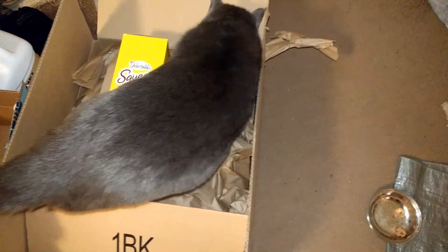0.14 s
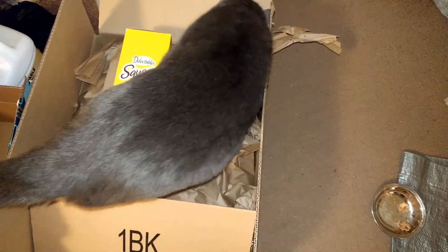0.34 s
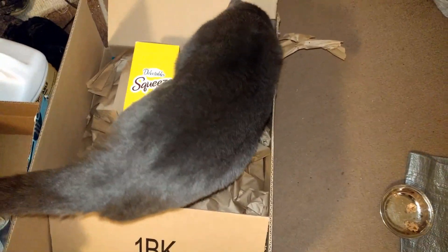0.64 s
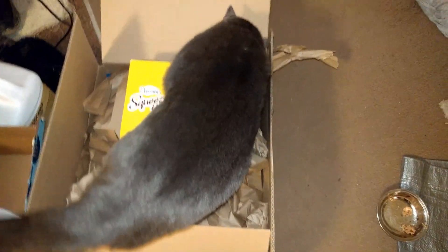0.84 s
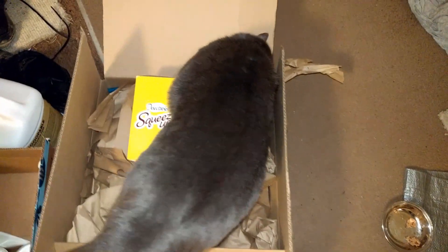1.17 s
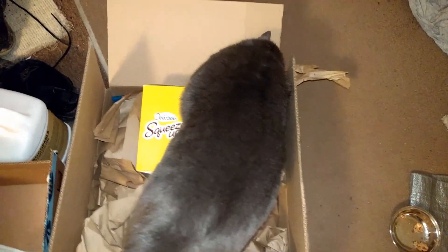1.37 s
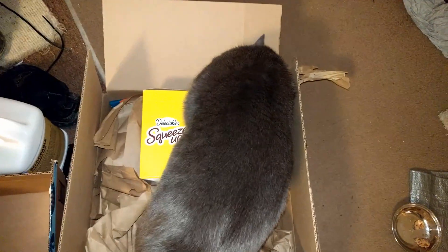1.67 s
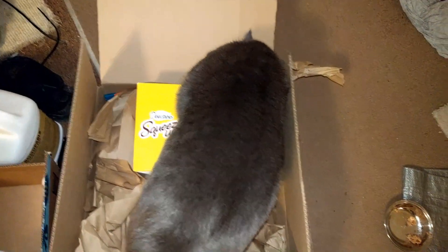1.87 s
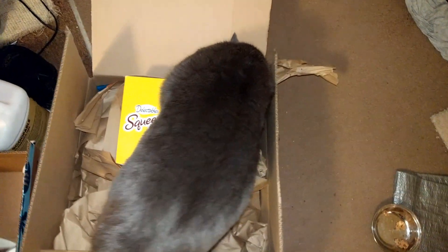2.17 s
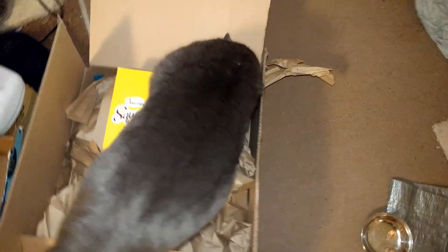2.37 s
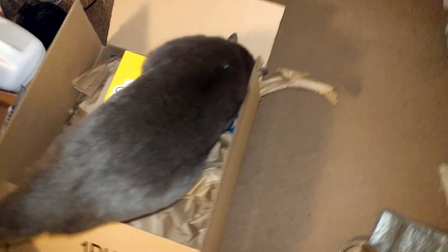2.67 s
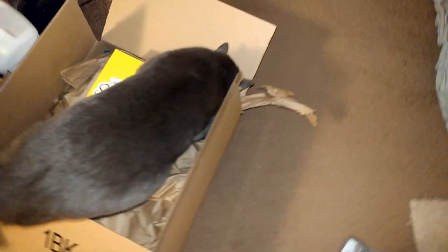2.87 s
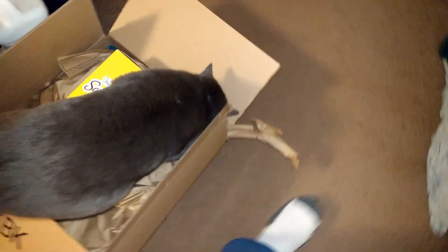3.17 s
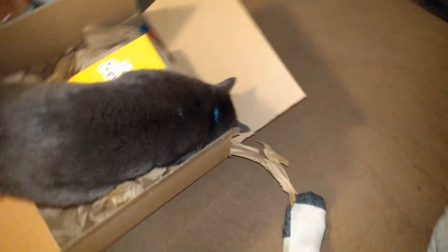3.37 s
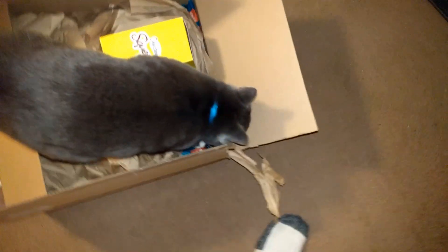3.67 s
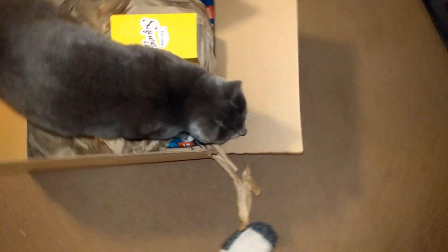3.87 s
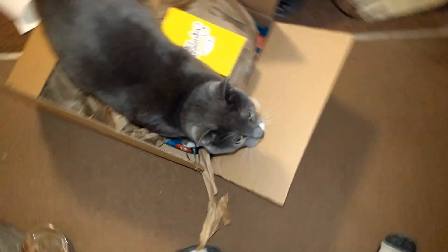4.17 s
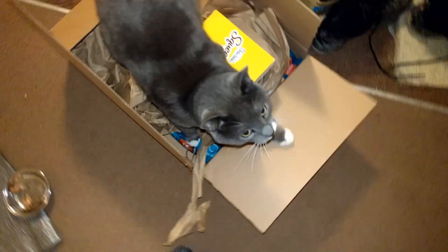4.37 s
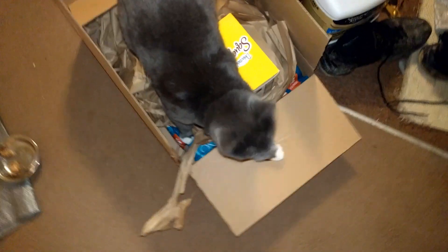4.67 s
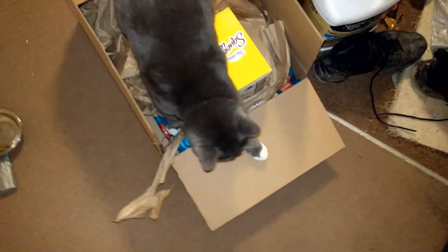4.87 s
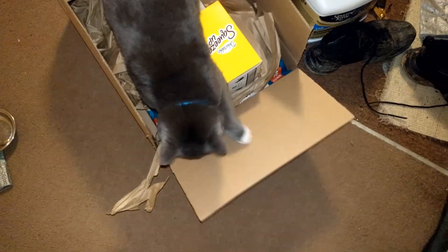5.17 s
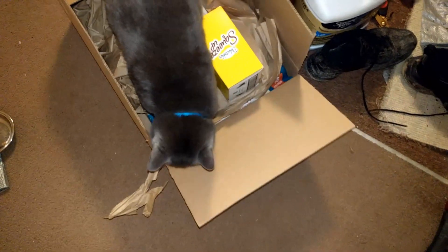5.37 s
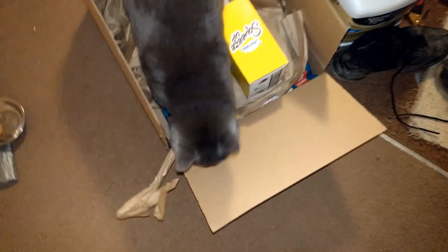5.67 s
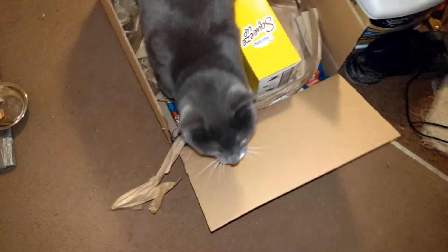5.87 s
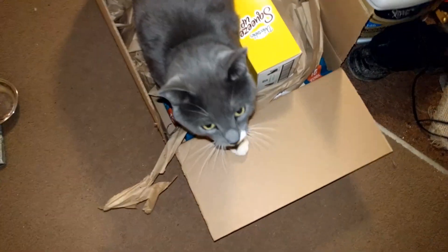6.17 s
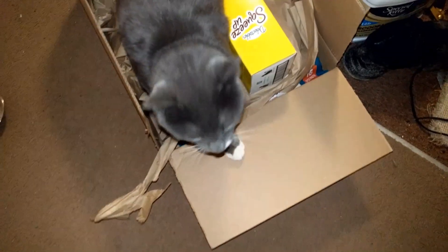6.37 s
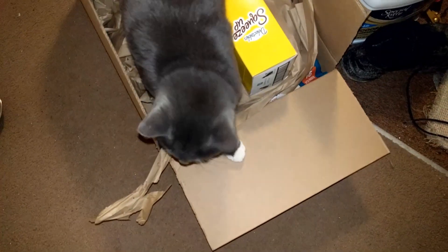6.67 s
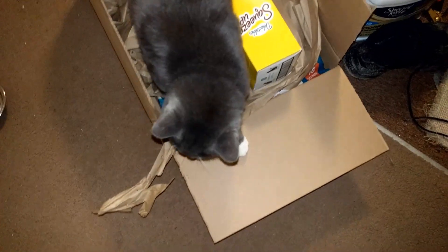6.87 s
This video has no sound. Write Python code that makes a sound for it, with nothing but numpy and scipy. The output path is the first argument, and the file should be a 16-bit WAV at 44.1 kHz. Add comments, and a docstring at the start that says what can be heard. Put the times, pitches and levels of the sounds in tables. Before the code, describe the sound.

Close, dry sound of a cat rummaging in a cardboard box full of crumpled packing paper, in a quiet carpeted room. Faint low air, a weak wavering hum and slight hiss run throughout. From 0 to 1 second, paws shove the paper in short gritty scrapes, with crisp snaps, soft thumps and hollow cardboard knocks around 0.4 and 0.9. From 1 to 2 the crinkling continues, with a longer fluttering crackle near 1.55. After a lull, sharp pops come at about 2.46 and lighter rustles follow. At 3.15 a wad gives way: a dense, bright burst of snaps, the loudest moment, lasting about 0.15 seconds. Scattered clicks come near 3.9. From 4.4, smooth fur strokes swell softly with fine crackle, a clear cardboard tap sounds at 5.1, then gentle brushing and small taps around 6 to 6.4 fade to near quiet by 7.

```python
"""A cat noses through a cardboard box of crumpled packing paper in a quiet carpeted room with a humming appliance.
From the start its body rubs the paper (streams of tiny slips), paws shove sheets, knock and scuff the cardboard
(decaying tones), and creases snap (clicks with a flutter). After 3 seconds a wad gives way in a burst of small snaps.
From about 4.4 seconds fur also strokes the paper in smooth swells of fine crackle.
Air, hum (wavering tones) and hiss last throughout; the microphone port rings, mainly near 7 kHz."""
import sys
import numpy as np
from scipy import signal
from scipy.fft import rfft, irfft, next_fast_len
from scipy.io import wavfile
from scipy.ndimage import uniform_filter1d

SR = 44100
rng = np.random.default_rng(int(sys.argv[2]) if len(sys.argv) > 2 else 0)


def file_out(sig):
    """Save sig as 16-bit WAV at sys.argv[1]."""
    # one column per channel
    cols = np.atleast_2d(sig).T
    # limit, then scale
    lim = np.clip(cols, -1, 1)
    pcm = np.round(lim * 32767).astype(np.int16)
    wavfile.write(sys.argv[1], SR, pcm)


N = 309577
T = np.arange(N) / SR  # time in seconds

# Colour of the low room noise. Each row: frequency in Hz, relative level in dB.
ROOM_AIR = [(20, -43), (31, -32), (42, 0), (52, 5.5), (68, -3), (90, -1.5), (130, -2.5), (200, -3),
            (300, -7), (480, -8), (650, -18), (1100, -20), (2500, -27.5), (7000, -32), (15000, -34.5)]
# Tones of the appliance hum. Each row: frequency in Hz, rms level in dB before its waver and swell.
HUM = [(64.3, -66.5), (57.6, -56.5), (120.3, -66), (235.7, -68)]
# Hum level as the microphone moves through the standing waves of the room. Each row: time in seconds, change in dB.
HUM_SWELL = [(0, -11.5), (1.8, -3), (4, 0.5), (5.3, -7), (7, -3.5)]
# The body leaning and rubbing on the paper. Each row: time in seconds, relative treble and middle levels in dB.
RUB = [(0, -56, -60), (.76, -60, -66), (1, -55, -63), (1.19, -58, -66), (1.4, -55, -62.5),
       (1.9, -56.5, -62.5), (2, -56, -69), (2.28, -49.5, -69.5), (2.4, -59, -66), (2.9, -53, -66),
       (3.13, -49, -61), (3.45, -54, -68), (3.879, -55.5, -74.5), (4.24, -57, -75), (4.35, -47.5, -63.5),
       (4.46, -49.5, -64.5), (4.781, -54, -56), (5.05, -67.5, -68.5), (5.54, -61.5, -74), (5.8, -55, -64.5),
       (6.1, -53, -59), (6.36, -57.5, -65), (6.47, -70, -74), (7.02, -77, -93)]
RUB_UNEVEN_DB, RUB_CATCHES_PER_S = 1.9, 40
# Facets of crumpled paper, large to small. Each row: resonance in Hz, its width in Hz.
FACETS = [(500, 1080), (1100, 1160), (2000, 1000), (3500, 1800), (5600, 2200), (7500, 3300), (10000, 2300),
          (13500, 9600)]
# The two colours of sliding paper. Each row: frequency in Hz, relative level in dB.
SLIDE_TREBLE = [(1500, -45), (3500, -5.5), (5000, 6.5), (7000, 5.5), (10000, 7), (12500, 2), (16000, -36)]
SLIDE_MIDDLE = [(100, 3), (350, 8), (700, 0), (1300, -0.5), (2500, -4), (4500, -6), (8000, -13),
                (16000, -48)]
# A paw shoves a sheet along. Each row: start and length in seconds, relative treble and middle levels in dB.
SHOVES = [(0.014, 0.095, -44.5, -54), (0.173, 0.11, -51, -48), (0.324, 0.1384, -45.5, -52),
          (0.573, 0.082, -43, -67), (0.621, 0.079, -43, -60), (0.814, 0.079, -49, -55),
          (0.932, 0.064, -56, -53.5), (1.017, 0.09, -56.5, -53), (1.252, 0.12, -65, -54.5),
          (1.409, 0.11, -49.5, -51.5), (1.538, 0.092, -40.5, -59), (1.625, 0.078, -63, -50),
          (1.742, 0.18, -57, -57.5), (2.445, 0.088, -43.5, -53), (2.643, 0.13, -54, -52),
          (2.81, 0.098, -62, -53), (2.913, 0.051, -73, -54), (3.133, 0.035, -41, -51),
          (3.32, 0.059, -53, -51.5), (3.88, 0.19, -48, -58.5), (4.692, 0.11, -70, -56),
          (4.892, 0.083, -60, -55), (5.123, 0.056, -79, -51), (5.408, 0.074, -62, -59)]
SHOVE_RISE = 0.07  # share of a shove spent gathering speed
# Small creases that give at random during a shove; their (treble, middle, low) levels are relative to the shove.
TICKS_PER_S, TICK_DB, TICK_SCATTER_DB, TICK_RING_MS = 55, (-3, -4, -7.5), 4, 5.6
TICK_FLUTTER_DB, TICK_SETTLE_DB = -2, -5  # sheet flutter and settling paper, relative to the first click
TICK_FOLD_HZ = (1310, 7760)  # range of their resonances
# Paws on the cardboard panels. Each row: start in seconds, peak level in dB before the low cut, panel pitch in Hz,
# time to ring down by 60 dB in seconds, fading time of the scuff in seconds.
KNOCKS = [(0.024, -37.5, 757, 0.019, 0.0048), (.354, -37.5, 765, 0.017, 0.0053),
          (.39, -41.5, 433, 0.028, .008), (.391, -32.5, 590, 0.027, 0.0032),
          (.3955, -33.5, 873, 0.043, 0.003), (.41, -41, 730, 0.0063, 0.037),
          (.92, -31, 1080, 0.016, 0.0023), (.9203, -38, 330, 0.028, 0.00089),
          (4.462, -48, 1450, 0.0075, 0.07), (4.478, -48, 854, 0.0042, 0.056),
          (4.468, -47.5, 442, 0.011, 0.095), (5.1173, -29, 793, 0.025, 0.00028),
          (5.1175, -33, 1550, 0.011, .0004), (5.126, -43, 640, 0.014, 0.013),
          (5.14, -41, 1100, 0.0037, 0.026), (5.412, -51.5, 2500, 0.005, 0.02),
          (6.101, -45, 900, 0.0035, 0.0042), (6.111, -47, 520, 0.0065, 0.028),
          (6.205, -38.5, 1080, 0.0031, .004), (6.303, -42.5, 1220, 0.008, 0.0036),
          (6.377, -42, 1250, 0.0042, 0.0023)]
# Ring of a panel. Each row: multiple of the panel pitch, relative level in dB.
PANEL = [(1.001, 15), (1.5, -6), (1.85, -22), (2.7, -29)]
# Soft steps on the box floor. Each row: start in seconds, level in dB, final pitch in Hz,
# time to die away by 60 dB in seconds.
STEPS = [(0.1333, -31.5, 95, 0.027), (.672, -40.5, 105.1, 0.035), (0.698, -50, 69.6, 0.25),
         (1.431, -47, 388, 0.056), (2.11, -40, 213, 0.026), (3.182, -41, 195, 0.074),
         (3.272, -44, 318, 0.039)]
# Loud creases snapping through. Each row: start in seconds, relative treble, middle and low levels in dB,
# ring time of the sheet in ms, its flutter and the settling paper in dB relative to the first click,
# resonance of the fold in Hz.
CREASES = [(.0248, -41, -40, -40.5, 8, -4, -13, 4410), (.034, -31, -34.5, -41, 10.6, 8, -22, 8000),
           (.0861, -63, -41.5, -40, 15, 13, -16, 3100), (.18, -34.5, -40.5, -41, 14, 1, -7, 3700),
           (.2168, -45, -43, -35, 9, 5, -14, 4400), (.2249, -46, -46, -36, 10, -5, -15, 4500),
           (.2442, -44, -41, -50, 13, 11, -12, 5000), (.2653, -36, -44, -55, 11, 3, -17, 2600),
           (.3275, -59, -44.5, -46, 14, 8, -11, 4190), (.3535, -62, -53, -39, 10, -7, -7, 3630),
           (.3943, -42, -45, -35, 12, -4, -8, 6000), (.409, -43.5, -43.5, -41, 10, 0, -9, 5200),
           (.5022, -24, -34, -44, 15, 6, 0.5, 2770), (.5646, -35.5, -39, -52, 12, 5, -2, 6300),
           (.568, -30, -45, -44, 10, -1, -11, 6190), (.6155, -25, -34.5, -40, 13, 3, -2, 8020),
           (.622, -43, -39, -55, 7.6, 2, -10, 5850), (.7, -44.5, -58, -64, 6, -7, -20, 5480),
           (.8102, -32, -33.5, -49, 14.2, -3, 1, 2500), (.8128, -29, -36.5, -39.5, 13, -18, 3, 5270),
           (.9199, -28, -30.5, -28, 9.1, -2, -3.5, 2280), (.9237, -43, -45, -40, 8.4, -11, 1, 5270),
           (1.0245, -63, -48.5, -61, 20, 7, 2, 2200), (1.043, -56, -54, -62, 9, 2, -7, 4020),
           (1.2175, -64, -65, -55, 13, -1, -8, 2000), (1.2355, -53, -47, -48, 9.3, 0, -8, 4800),
           (1.073, -39, -38.5, -43, 20, 4, -20, 5000), (1.1445, -41, -43.5, -48.5, 19, 6, -10, 3500),
           (1.2623, -39.5, -38, -37.5, 26.6, 13, -15, 1710), (1.335, -39, -40, -37, 31, 4, -5, 4600),
           (1.413, -36.5, -64, -61, 6.6, -4, -14, 3605), (1.4225, -51, -61, -54, 9, 0, -8, 9510),
           (1.4455, -42, -62, -59, 15, 0, -7, 6910), (1.491, -32.5, -52, -59, 7.2, 0, -1, 9560),
           (1.502, -41, -46, -55, 16.4, 3, -1, 5280), (1.5475, -26, -41, -43, 110, 17, 10, 3110),
           (1.5625, -29, -47, -48, 38, 1, 2, 3900), (1.633, -42, -48, -57, 20, 4, -6, 3300),
           (1.696, -56, -61, -57, 17, 2, -10, 2300), (1.7485, -47, -55, -60, 8.6, 0, -9, 5880),
           (1.7665, -34.5, -41.5, -53, 20, -1, -14, 2850), (1.815, -46, -46, -53, 28, 9, -7, 3470),
           (1.8525, -36.5, -46, -33.5, 19, 5, -17, 1500), (1.9052, -37.5, -46, -41, 41, 7, 1, 2950),
           (2.0365, -44, -77, -70.5, 9.1, -5, -16, 6310), (2.3559, -70, -42.5, -40, 42, 4, -10, 5900),
           (2.4575, -39, -42, -43, 8, -7, -14, 5500), (2.4622, -30, -61, -43, 5.7, -4, -14, 6830),
           (2.4651, -21, -40.5, -40.5, 9.3, -29, -23, 3166), (2.4755, -33, -49, -64, 9.7, 6, -5, 6340),
           (2.6575, -34.5, -41.5, -47, 6.2, -3, -8, 13000), (2.6745, -41, -42, -62, 20, 8, -3, 4640),
           (2.735, -60, -63, -50, 13, 0, -15, 2990), (2.819, -45, -55, -70, 27, -6, -2, 4090),
           (2.836, -52, -52, -62, 14, 2, -5, 4500), (2.8558, -38, -59, -60, 15, 2, -15, 5745),
           (2.9156, -60, -49, -60, 18, 6, -11, 4200), (3.1546, -23, -38, -51, 8.4, -4, -4, 7500),
           (3.157, -32, -33.5, -45, 7, -8, 0, 3750), (3.1655, -23, -33.5, -56, 12, -3, 1, 8500),
           (3.175, -20, -30, -37, 8, 1, -2, 8500), (3.1868, -10, -37, -42, 6, -16, -25, 1820),
           (3.1946, -27, -40, -55, 5.4, -4, -8, 9500), (3.2012, -27, -43, -35, 6, -8, -9, 5700),
           (3.209, -23, -42, -37, 11, 5, -8, 5640), (3.2135, -28, -38, -52, 9.8, -2, 0, 6240),
           (3.223, -33.5, -30, -36, 13.6, -3, 9, 2940), (3.229, -27, -45, -51, 12, 6, -8, 2200),
           (3.2345, -31, -46, -41, 6, -3, -6, 6500), (3.243, -27, -35, -39, 18, -2, 7, 3460),
           (3.2465, -26, -41, -48, 17, 0, -3, 6200), (3.264, -30, -44, -38, 9, -5, -1, 6600),
           (3.2825, -26, -35, -27.5, 31, 11.5, 10, 1500), (3.3053, -41, -50, -41, 7, -6, -6, 1500),
           (3.342, -36, -44.5, -47, 26, 0, 8, 3080), (3.8235, -40, -45.5, -35.5, 22, 0.5, -2, 5400),
           (3.9012, -27, -36.5, -39.5, 5, -4, -18, 4250), (3.9036, -33.5, -40, -49, 11, -1, -5, 6820),
           (3.9767, -28, -41, -39.5, 10, -6, -3, 5200), (3.999, -41, -56, -60, 16, 2, -8, 4910),
           (4.04, -49, -53, -47, 16, -1, -9, 6000), (4.6952, -72, -46.5, -63, 12, -11, -13, 2304),
           (4.9034, -39, -34, -42.5, 8.6, -4, -8, 5150), (5.021, -48, -78, -71, 15, 4, -8, 4800),
           (5.1173, -40.5, -32.5, -43.5, 10, -5, -8.5, 2500), (6.302, -43.5, -42, -49, 20, 4, -10, 3750),
           (6.378, -61, -52.5, -54, 13, 12, -5, 1790)]
# Basic colour of a snap. Each row: frequency in Hz, relative level in dB.
SNAP_COLOUR = [(100, -7.5), (300, -4.5), (800, 4), (1500, 2), (3000, -2.5), (4600, -0.5), (7000, -8),
               (10500, -16.5), (12500, -21), (16000, -59)]
TIGHT_FOLD_HZ, TIGHT_DB_PER_OCTAVE = 6940, 16  # folds above this pitch snap with an ever crisper top
# A wad collapses under the cat: its crackle holds steady, then dies away, the treble first.
WAD_START_S, WAD_FADE_DB_PER_S = 3.156, 202.5
WAD_TREBLE_DB, WAD_TREBLE_HOLD_S = -43.5, .1
WAD_MIDDLE_DB, WAD_MIDDLE_HOLD_S = -46.5, 0.13
WAD_TICKS_PER_S, WAD_TICK_DB = 110, (5, -7, -3)  # small creases; (treble, middle, low) relative to its treble
# The chest strokes the paper. Each row: start and length in seconds, relative treble and middle levels in dB.
STROKES = [(4.435, 0.14, -57, -66), (4.678, 0.18, -52, -64), (5.59, 0.17, -52, -61), (5.75, 0.18, -66, -70),
           (5.842, 0.22, -56, -54), (6.044, 0.15, -49.5, -55.5), (6.176, 0.068, -54, -66)]
# Resonances of the microphone port. Each row: frequency in Hz, width in Hz, boost in dB.
PORT = [(6570, 1210, 7), (6906, 880, 5.5), (10400, 900, 1)]
TOP_HZ = 15900  # the microphone passes nothing much above this


def undb(db):
    """Turn decibels into a gain."""
    return 10 ** (np.asarray(db) / 20)


def unit(x):
    """Scale a sound to rms 1."""
    return x / np.sqrt(np.mean(x ** 2))


def fade(t, t60):
    """A natural dying away: down by 60 dB after t60 seconds."""
    return np.exp(-np.log(1000) * t / t60)


def add(out, s, x):
    """Mix the sound x into out from time s."""
    i = max(int(s * SR), 0)
    out[i:i + len(x)] += x[:N - i]


def shape(points, size):
    """Read a (Hz, dB) curve as gains at the frequencies of a transform."""
    hz, db = np.transpose(points)
    bins_hz = np.arange(size // 2 + 1) * SR / size
    return undb(np.interp(np.log(bins_hz + 1), np.log(hz), db))


def colour(x, points):
    """Filter a long noise with a (Hz, dB) curve and scale it to rms 1."""
    size = next_fast_len(N, True)
    spectrum = rfft(x, size) * shape(points, size)
    return unit(irfft(spectrum, size)[:N])


def causal(gain):
    """Make the click with these gains whose energy comes as early as possible."""
    cepstrum = irfft(np.log(gain))
    half = len(cepstrum) // 2
    cepstrum[1:half] *= 2
    cepstrum[half + 1:] = 0
    return irfft(np.exp(rfft(cepstrum)))


def walk(rate):
    """Smooth random drift with a spread near 1, heading for a new value `rate` times a second."""
    knots = rng.standard_normal(1024)
    drift = np.interp(T * rate, np.arange(len(knots)), knots)
    return uniform_filter1d(drift, int(SR / rate / 2)) * np.sqrt(2)


def background(air_db=-57.0, waver_db=2.1, hiss_db=-77.0):
    """Low room noise, a wavering hum and a faint hiss, all in the middle."""
    air = colour(rng.standard_normal(N), ROOM_AIR) * undb(air_db + .5 * walk(2.62))
    hum = np.zeros(N)
    for hz, db in HUM:
        level = np.sqrt(2) * undb(db + waver_db * walk(3.57))
        hum += level * np.sin(2 * np.pi * hz * T + .5 * walk(3.08))
    hum = hum * undb(np.interp(T, *np.transpose(HUM_SWELL)))
    return air + hum + undb(hiss_db) * rng.standard_normal(N)


def crackle(per_s, spread_db):
    """Tiny fibre slips at random moments; a wider spread makes their sizes more unequal."""
    sizes = undb(spread_db * np.minimum(rng.exponential(size=N), 5))
    happens = rng.random(N) < per_s / SR
    return unit(happens * sizes * rng.choice([-1, 1], N))


def facets(per_s, spread_db, soft_hz=3000):
    """Every slip rings one facet of the paper at its own pitch; the large, low facets give more evenly."""
    out = 0
    for hz, width in FACETS:
        slips = crackle(per_s * max(width, 1500) / 2000, spread_db * min(hz / soft_hz, 1))
        out = out + signal.lfilter(*signal.iirpeak(hz, hz / width, fs=SR), slips)
    return unit(out)


def rustle(slips, treble, middle):
    """Sliding paper, fed by a stream of slips: fibres hiss, the sheets sound lower."""
    return colour(slips, SLIDE_TREBLE) * treble + colour(slips, SLIDE_MIDDLE) * middle


def rubbing(treble_db=-12.5, middle_db=2.5):
    """The body drags gritty paper, catching and slipping; once the cat stands still, its fur rubs more smoothly."""
    s, treble, middle = np.transpose(RUB)
    gritty = np.interp(T, [3.4, 4.2], [.95, .5])
    grit = unit(facets(per_s=330, spread_db=1.0) + 0.39 * crackle(per_s=180, spread_db=1.0))
    slips = np.sqrt(gritty) * grit + np.sqrt(1 - gritty) * rng.standard_normal(N)
    slips = slips * undb(RUB_UNEVEN_DB * walk(RUB_CATCHES_PER_S))
    treble_gain = undb(np.interp(T, s, treble) + treble_db)
    middle_gain = undb(np.interp(T, s, middle) + middle_db)
    return rustle(slips, treble_gain, middle_gain)


def shoves():
    """Treble and middle gain of the shoved sheets: each shove gathers speed, then slows to a stop."""
    gains = np.zeros((2, N))
    for s, length, treble_db, middle_db in SHOVES:
        speed = np.interp(T, [s, s + SHOVE_RISE * length, s + length], [0, 1, 0])
        gains += undb([[treble_db], [middle_db]]) * np.sqrt(speed)
    return gains


def treading(gains, treble_db=-16, middle_db=-2.5):
    """Shoved sheets crackle coarsely as their facets slip."""
    grit = unit(facets(per_s=130, spread_db=1.5) + 0.54 * crackle(per_s=130, spread_db=-0.5))
    return rustle(grit, gains[0] * undb(treble_db), gains[1] * undb(middle_db))


def ticks(shove, per_s, tone_db):
    """Small creases at random moments, as strong as the push that bends them; rows like those of CREASES."""
    count = 2400
    times = rng.random(count) * T[-1]
    luck = rng.random(count) * count / T[-1]  # keeping those below per_s leaves about per_s each second
    levels = np.array(tone_db) + TICK_SCATTER_DB * rng.standard_normal((count, 3))
    folds = rng.uniform(*TICK_FOLD_HZ, count)
    push = np.interp(times, T, shove)
    rows = []
    for s, u, db, p, hz in zip(times, luck, levels, push, folds):
        if u < per_s and p > 1e-4:
            tone = db + 20 * np.log10(p)
            rows.append((s, *tone, TICK_RING_MS, TICK_FLUTTER_DB, TICK_SETTLE_DB, hz))
    return rows


def cardboard(contact_db=18, sag=1.0, sag_s=0.0027, lowest_hz=260):
    """Claws scuff the damped panels of the box; pads thump its floor, whose pitch falls as it takes the weight."""
    panels, floor, t = np.zeros(N), np.zeros(N), T[:SR // 4]
    for s, db, hz, t60, scuff_s in KNOCKS:
        ring = sum(undb(d) * np.sin(2 * np.pi * hz * k * t) for k, d in PANEL) * fade(t, t60)
        push = rng.standard_normal(len(t)) * np.exp(-t / scuff_s)
        push[0] += undb(contact_db)  # the first contact, before the scuff
        knock = signal.fftconvolve(push, ring)[:len(t)]
        add(panels, s, undb(db) * knock / np.abs(knock).max())
    for s, db, hz, t60 in STEPS:
        turns = np.cumsum(hz * (1 + sag * np.exp(-t / sag_s))) / SR
        add(floor, s, undb(db) * np.sin(2 * np.pi * turns) * fade(t, t60))
    low_cut = signal.butter(2, lowest_hz, "high", fs=SR, output="sos")
    return signal.sosfilt(low_cut, panels) + floor


def disperse(x, hz=6500, radius=0.8, count=2):
    """Bending waves cross the sheet at different speeds, which smears each click a little."""
    poles = np.array([1, -2 * radius * np.cos(2 * np.pi * hz / SR), radius * radius])
    # the mirrored filter changes only the timing of each pitch, not its level
    return signal.sosfilt(np.tile(np.r_[poles[::-1], poles], (count, 1)), x)


def creases(rows, rebound_db=-3, settle_t60=0.13, settle_per_s=1100, fold_db=6, fold_width=0.17,
            ripple_db=3.5, size=512):
    """Each crease buckles in two quick steps, the sheet flutters, and paper around it settles in tiny slips."""
    out, t = np.zeros(N), T[:SR // 5]
    ripple_hz = np.geomspace(300, 16000, 26)
    bins_hz = np.arange(size // 2 + 1) * SR / size
    for s, treble_db, middle_db, low_db, ring_ms, flutter_db, settle_db, fold_hz in rows:
        ring, settle = rng.standard_normal((2, len(t)))
        ring = ring * fade(t, ring_ms / 1000)
        settle = settle * (rng.random(len(t)) < settle_per_s / SR) * fade(t, settle_t60)
        snap = undb(flutter_db) * ring / np.linalg.norm(ring)
        snap += undb(settle_db) * settle / np.linalg.norm(settle)
        # the first step, and the second 1.2 to 3 ms later
        snap[0] += 1
        snap[int(rng.uniform(.0012, .003) * SR)] += undb(min(flutter_db, 0) + rebound_db)
        levels = [(900, low_db), (2000, middle_db), (3800, middle_db), (6500, treble_db)]
        tone = shape(SNAP_COLOUR, size) * shape(levels, size)
        crisp_db = TIGHT_DB_PER_OCTAVE * max(np.log2(fold_hz / TIGHT_FOLD_HZ), 0)
        tone = tone * shape([(8500, 0), (13000, crisp_db)], size)
        # every fold has one main resonance among several weak ones
        tone = tone * undb(fold_db / (1 + (2 * (bins_hz / fold_hz - 1) / fold_width) ** 2))
        ripple = ripple_db * rng.standard_normal(len(ripple_hz))
        ripple = ripple - uniform_filter1d(ripple, 3)
        tone = tone * shape(np.c_[ripple_hz, ripple], size)
        add(out, s, signal.fftconvolve(snap / np.linalg.norm(snap), causal(tone)))
    return disperse(out) * undb(24.5)


def wad(attack_s=0.0014, crackle_db=-3.5):
    """A wad gives way: a run of small snaps, each with its own pitch, over a crackle that holds, then fades."""
    age = T - WAD_START_S
    attack = np.clip(age / attack_s + 1, 0, 1)  # full strength at the start time
    treble = attack * undb(WAD_TREBLE_DB - WAD_FADE_DB_PER_S * np.maximum(age - WAD_TREBLE_HOLD_S, 0))
    middle = attack * undb(WAD_MIDDLE_DB - WAD_FADE_DB_PER_S * np.maximum(age - WAD_MIDDLE_HOLD_S, 0))
    burst = rustle(facets(per_s=85, spread_db=1.0), treble * undb(crackle_db), middle)
    snaps = creases(ticks(treble, WAD_TICKS_PER_S, WAD_TICK_DB), fold_db=16.5, fold_width=0.12)
    return burst + snaps


def stroking(treble_db=-12, middle_db=-2.0):
    """Fur sweeps over the paper in smooth strokes that set off a fine, dense grain."""
    gains = np.zeros((2, N))
    for s, length, high_db, mid_db in STROKES:
        swell = np.sin(np.pi * np.clip((T - s) / length, 0, 1)) ** 2
        gains += undb([[high_db], [mid_db]]) * swell
    return rustle(facets(per_s=650, spread_db=0.0), gains[0] * undb(treble_db), gains[1] * undb(middle_db))


def room(x, width, box_db=-9, box_t60=0.026, wet_db=-23.5, t60=0.022):
    """The box walls answer at once, the soft room later; width sets how far the left and right echoes differ."""
    t = T[:SR // 2]
    box = unit(fade(t, box_t60) * (t > .002))
    far = unit(fade(t, t60) * (t > .008))
    envelope = np.hypot(undb(box_db) * box, undb(wet_db) * far) / np.sqrt(len(t))
    tails = rng.standard_normal((2, len(t))) * envelope
    mid, side = (signal.fftconvolve(x, h)[:N] for h in tails)
    return x + mid + width * side * np.array([[1], [-1]])


def scene():
    """Paper and cardboard in the room: snaps spread a little, knocks and rubbing stay in the middle."""
    paws = shoves()
    sliding = rubbing() + treading(paws) + cardboard() + stroking()
    small = creases(ticks(paws[0], TICKS_PER_S, TICK_DB), fold_db=12)
    snaps = room(creases(CREASES) + small + wad(), width=.42)
    lean = undb(np.array([[-.35], [.35]]))  # slightly louder on the right
    return snaps * lean + room(sliding, width=0) + background()


def record(dry):
    """The cavity in front of the microphone rings, and the top is cut."""
    for hz, width, db in PORT:
        dry = dry + (undb(db) - 1) * signal.lfilter(*signal.iirpeak(hz, hz / width, fs=SR), dry)
    lowpass = signal.ellip(10, .2, 70, TOP_HZ, fs=SR, output="sos")
    return signal.sosfilt(lowpass, dry)


dry = scene()
out = record(dry)
file_out(out)
```